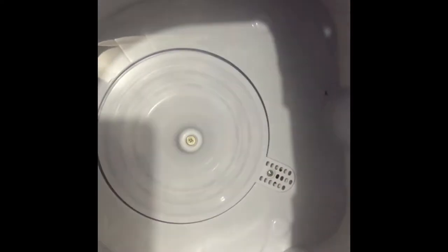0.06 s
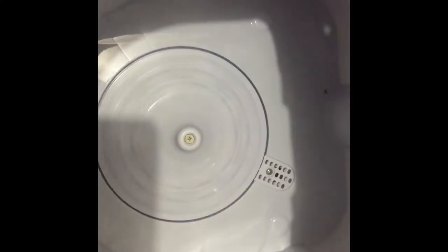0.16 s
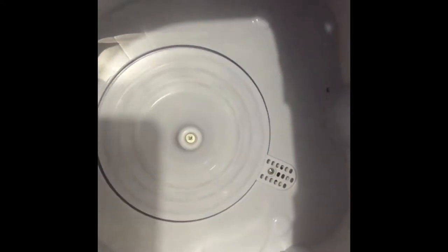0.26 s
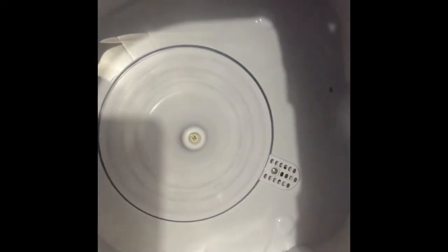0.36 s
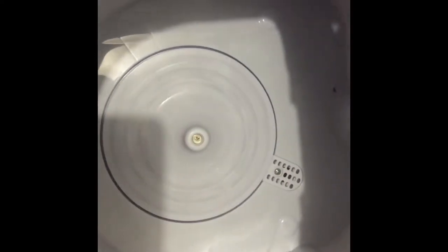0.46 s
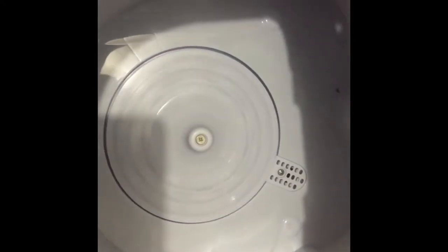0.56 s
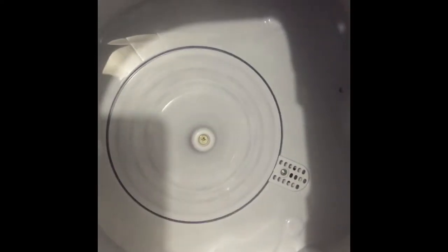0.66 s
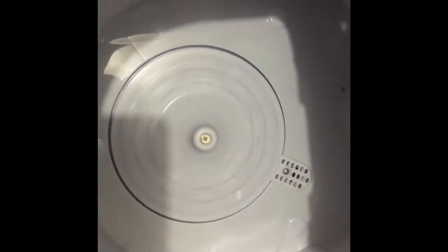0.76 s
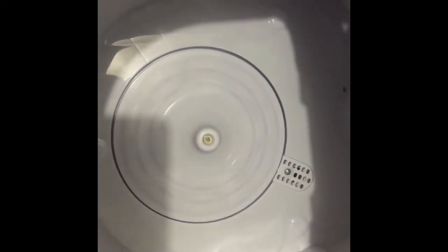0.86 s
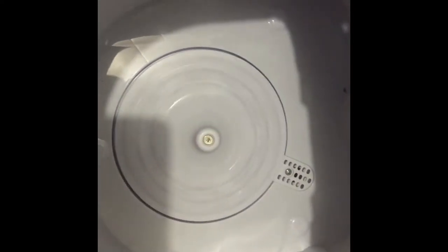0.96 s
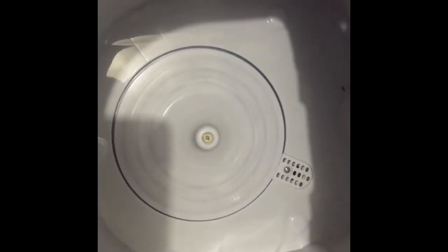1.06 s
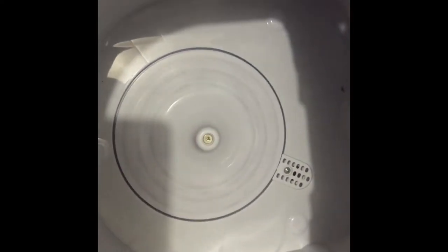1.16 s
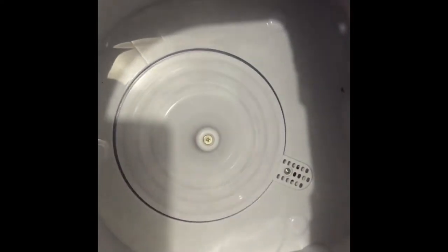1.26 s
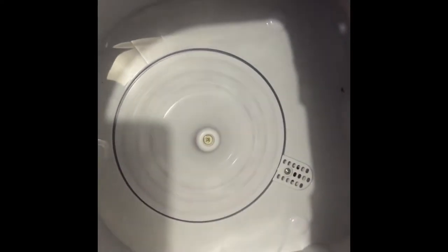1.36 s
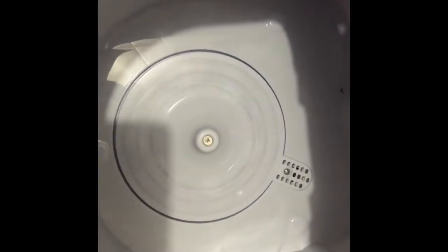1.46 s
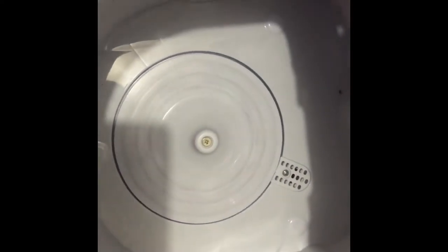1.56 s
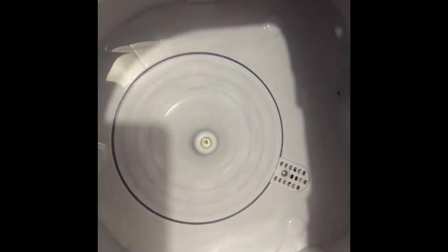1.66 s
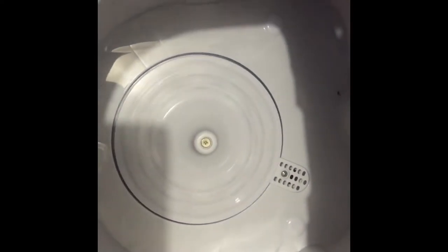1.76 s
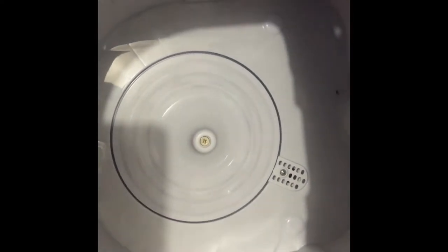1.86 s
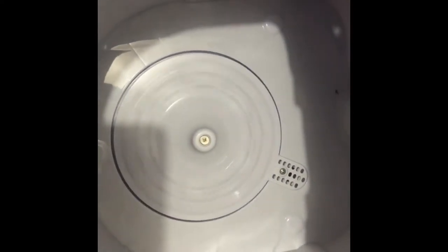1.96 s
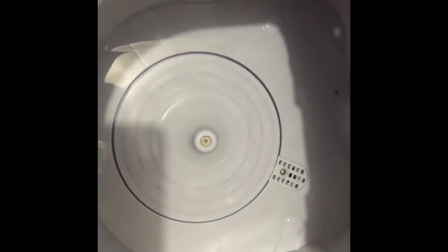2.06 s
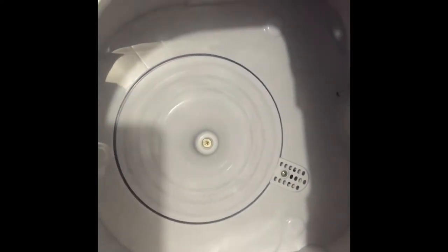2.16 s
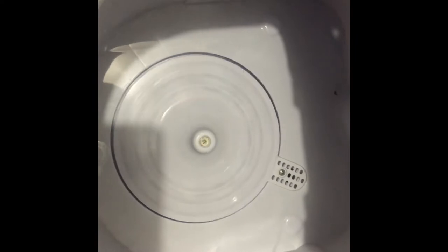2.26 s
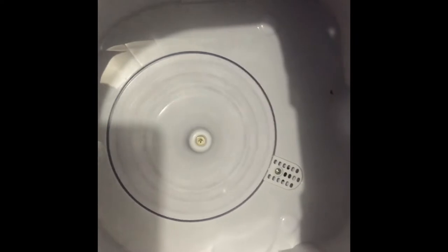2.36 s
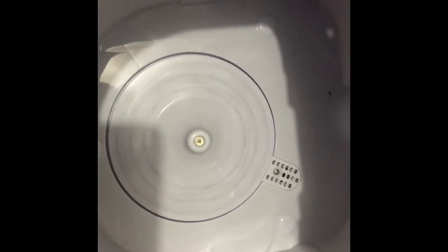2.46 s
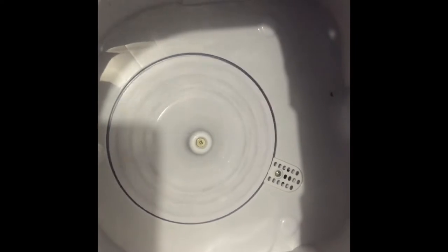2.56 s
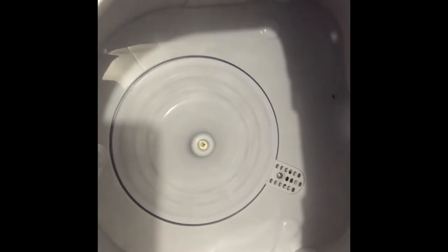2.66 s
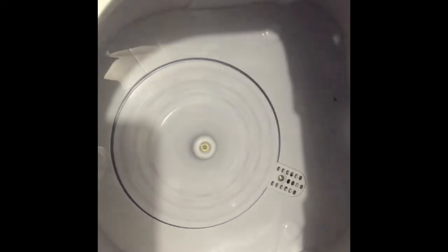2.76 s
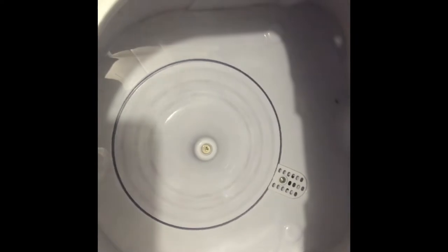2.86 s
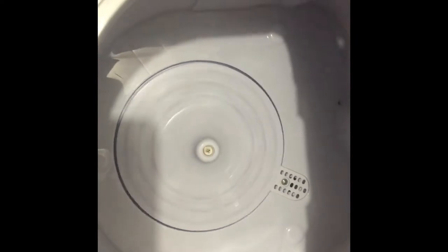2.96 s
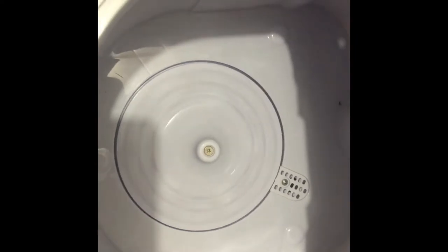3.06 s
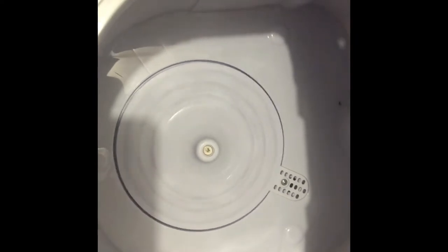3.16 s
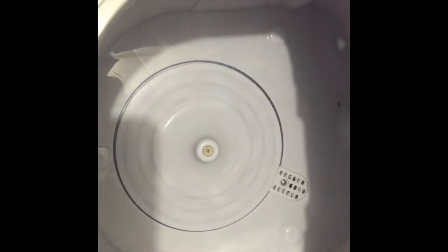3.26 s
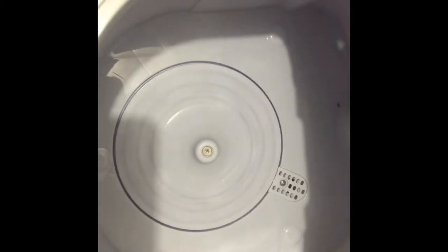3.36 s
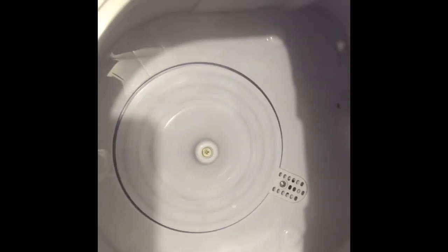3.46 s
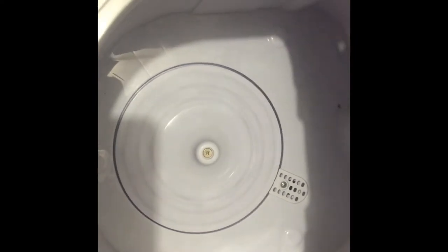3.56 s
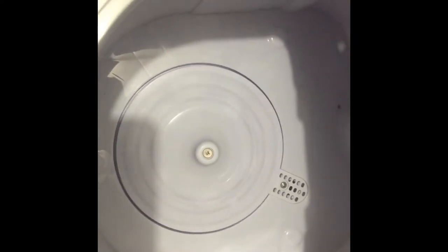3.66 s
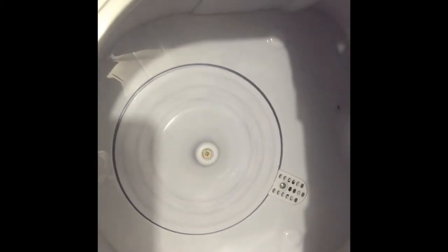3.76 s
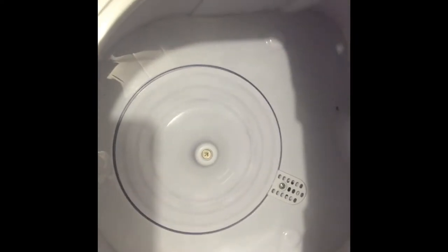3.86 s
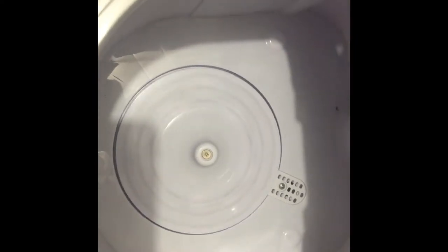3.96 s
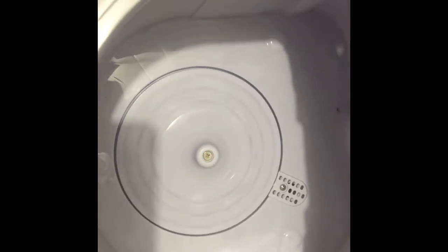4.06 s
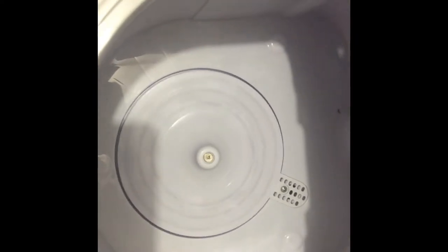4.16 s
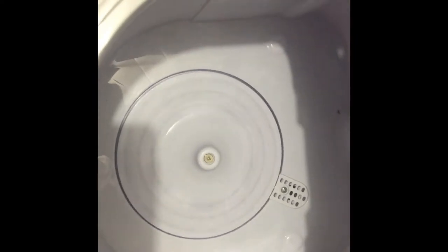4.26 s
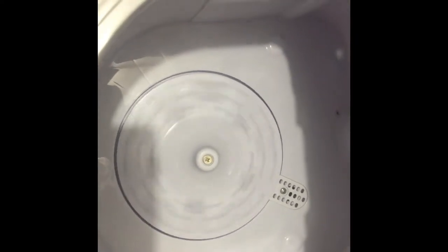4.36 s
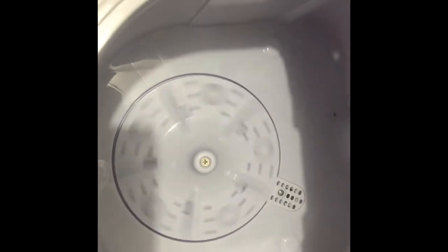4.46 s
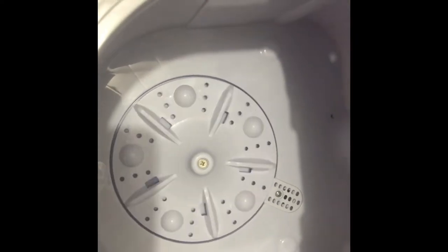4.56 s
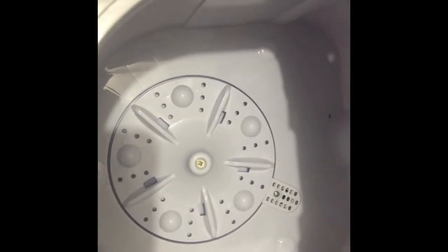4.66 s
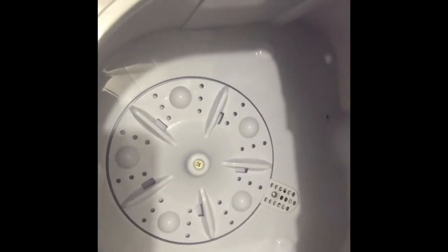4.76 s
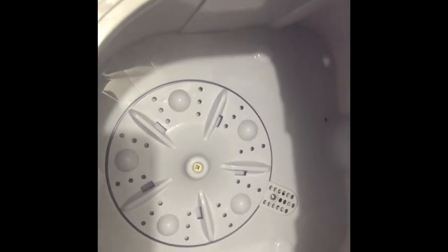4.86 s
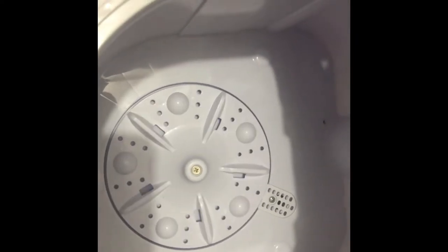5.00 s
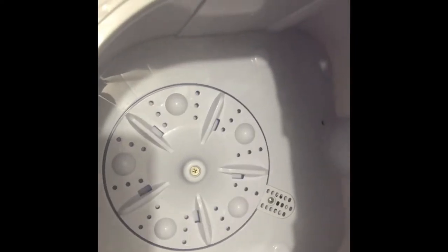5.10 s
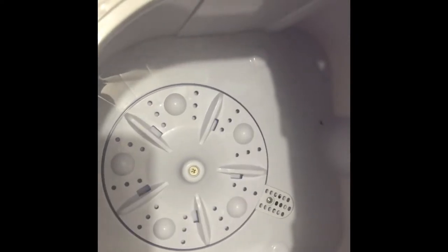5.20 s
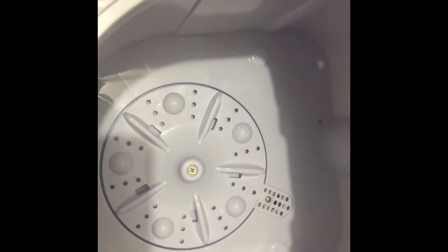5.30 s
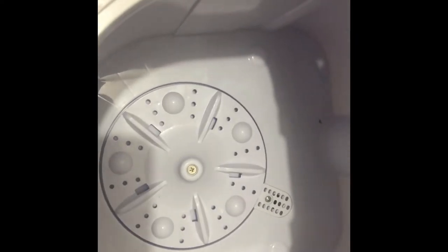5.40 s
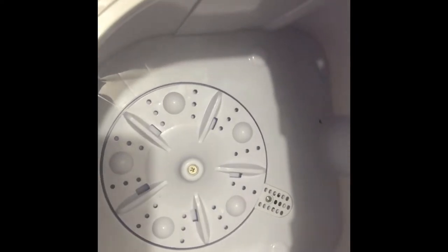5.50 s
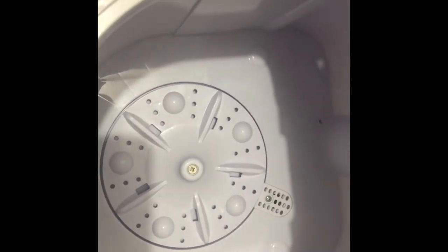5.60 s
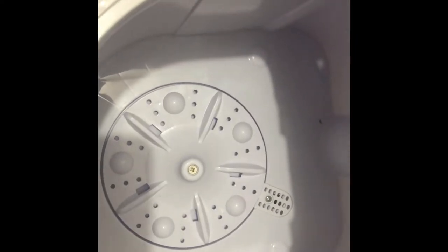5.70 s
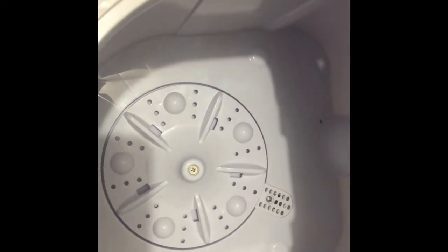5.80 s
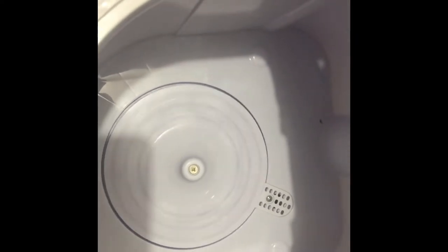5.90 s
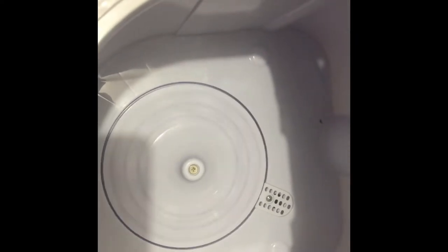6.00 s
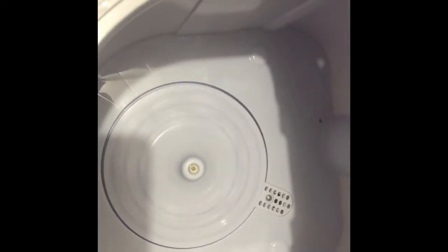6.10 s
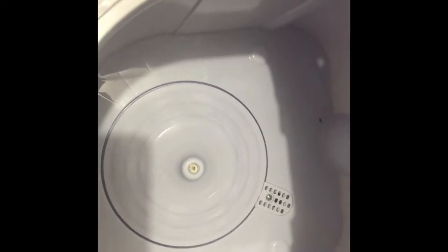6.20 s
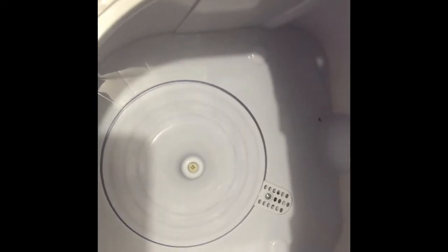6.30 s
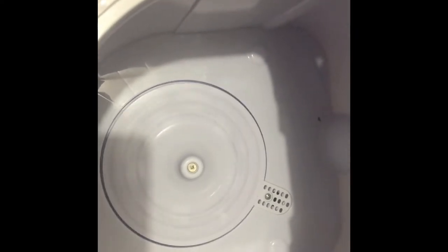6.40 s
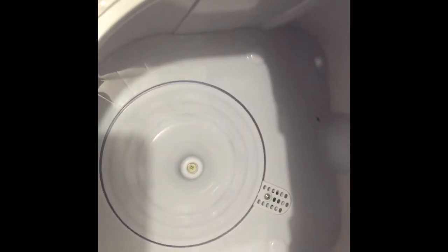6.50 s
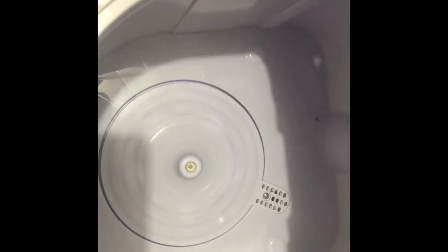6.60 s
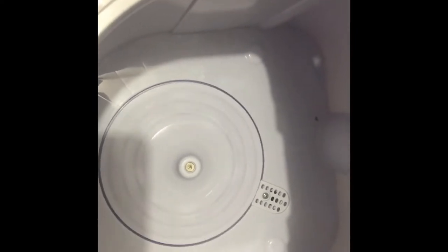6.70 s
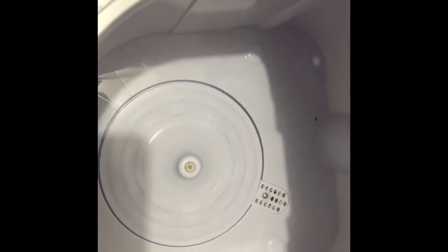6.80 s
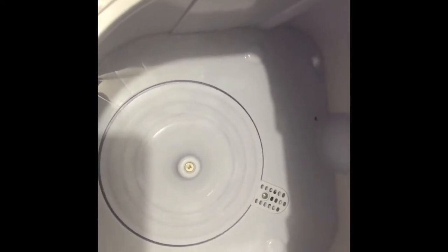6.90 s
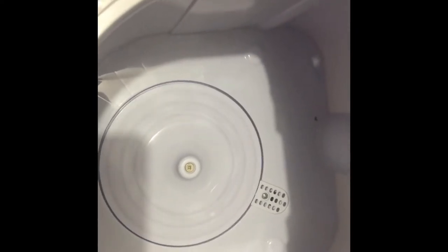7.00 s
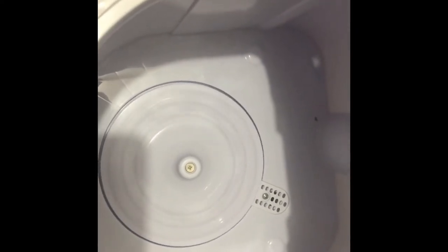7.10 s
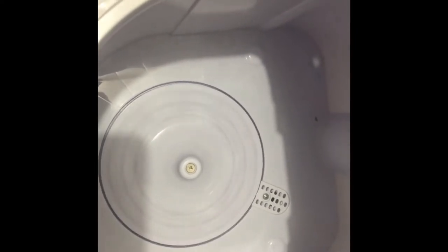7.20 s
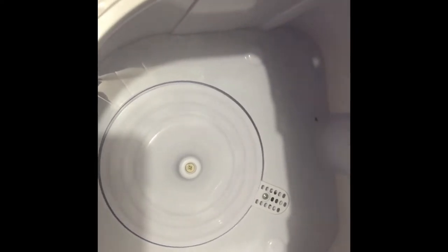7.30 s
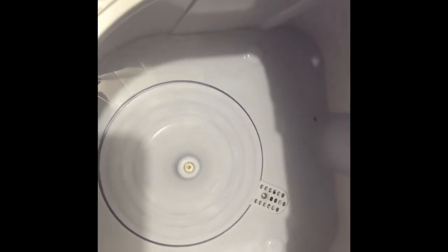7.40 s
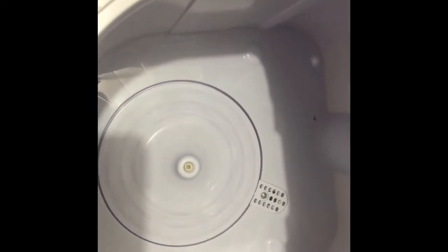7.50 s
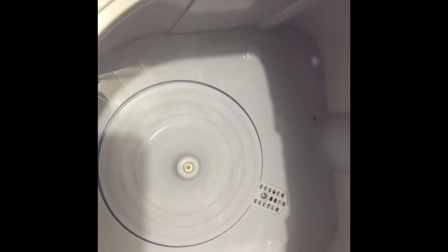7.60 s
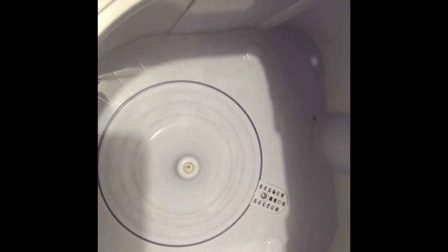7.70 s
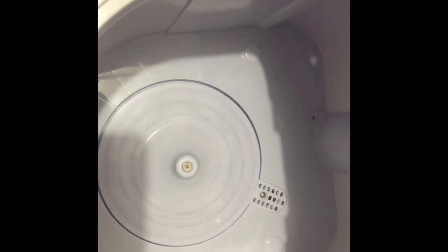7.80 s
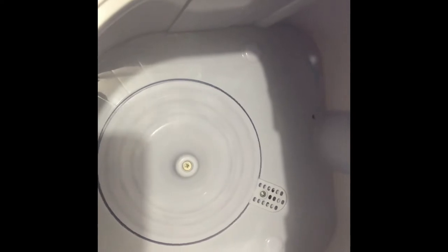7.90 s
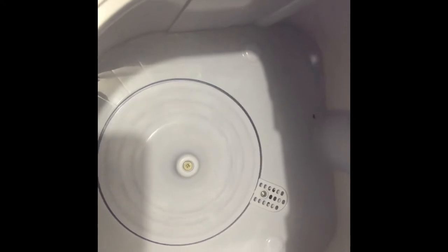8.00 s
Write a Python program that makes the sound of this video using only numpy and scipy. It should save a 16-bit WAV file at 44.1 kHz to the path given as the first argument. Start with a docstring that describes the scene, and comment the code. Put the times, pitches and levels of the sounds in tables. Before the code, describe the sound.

From 0 to 4.2 seconds a small electric motor turns the wash plate in an empty plastic tub, heard closely from above. Low mains hum and shaft tones make a steady, slightly swaying drone, with rumbling bumps, grainy bearing rattle around the middle range and a hissy belt swish about six times a second. At 4.2 the power cuts; the drone drops away and the drive coasts to rest by about 4.7, with small thumps at 4.23 and 4.35. A light, rapid flutter remains, dozens of short dry rubs a second with airy edges and thin sizzle, over low household noise and very faint tones. Its air swells slightly near 5.6. At 5.83 a sharp, bright switch snap and tub jolt restart the motor, which reaches full speed within a tenth of a second. The reversed drone, rattle and swish continue steadily until the end at about 8 seconds.

```python
"""The empty plastic tub of a small washing machine drones, heard from just above. A mains motor turns the wash plate
through a belt: shaft and hum tones drone, bumps shake the tub, bearings rattle and the belt joint swishes each lap.
Cut off, the drive coasts to rest and leaves a light flutter of rubs, each a short tone, some air and a thin sizzle.
A timer switch snaps in two noise bursts and the motor runs up the other way round. Low room noise lies beneath."""
import sys
import numpy as np
from scipy import signal
from scipy.fft import rfft, irfft, next_fast_len
from scipy.io import wavfile
from scipy.ndimage import uniform_filter1d

SR = 44100
rng = np.random.default_rng(int(sys.argv[2]) if len(sys.argv) > 2 else 0)


def store_pcm(level_fs):
    """Save levels as 16-bit WAV."""
    pcm = np.round(np.clip(level_fs, -1, 1) * 32767).astype(np.int16)
    wavfile.write(sys.argv[1], SR, np.atleast_2d(pcm).T)


N = 355005
TIME = np.arange(N) / SR

# full-speed turns a second of shaft, belt and wash plate; the magnetic pull comes at twice the mains frequency
SHAFT_HZ, BELT_HZ, PLATE_HZ, MAGNET_HZ = 28.45, 5.9084, 5.04, 120


def undb(db):
    """Decibels to gain."""
    return 10 ** (np.asarray(db) / 20)


def unit(x):
    """Scale to rms 1."""
    return x / np.sqrt(np.mean(x ** 2))


def colour(x, points):
    """Pass a sound through a response drawn between (Hz, dB) points on a log frequency axis; rms 1."""
    size = next_fast_len(N)
    hz, db = np.transpose(points)
    bins = np.maximum(np.fft.rfftfreq(size, 1 / SR), 1)
    gain = undb(np.interp(np.log(bins), np.log(hz), db))
    return unit(irfft(rfft(x, size) * gain, size)[:N])


def noise(points):
    """Coloured noise of rms 1."""
    return colour(rng.standard_normal(N), points)


def walk(rate):
    """Smooth random wander of rms 1, drawing a new value about rate times a second."""
    hold = max(int(SR / rate), 2)
    steps = np.repeat(rng.standard_normal(N // hold + 1), hold)
    return unit(uniform_filter1d(uniform_filter1d(steps, hold), hold)[:N])


def cycle(turns):
    """Cosine of an angle given in turns."""
    return np.cos(2 * np.pi * turns)


def bump(turns, width):
    """A smooth pulse at every whole turn; width in turns."""
    offset = (turns + .5) % 1 - .5
    return np.exp(-.5 * (offset / width) ** 2)


def bell(centre_s, width_s):
    """A single smooth rise and fall in time, peaking at 1."""
    return np.exp(-.5 * ((TIME - centre_s) / width_s) ** 2)


def decay(age, t60):
    """Exponential fall by 60 dB in t60 seconds."""
    return np.exp(-np.log(1000) * age / t60)


def surface(turns, count):
    """Unevenness of a turning part: the same bumps come round on every turn."""
    return unit(np.interp(turns % 1, np.linspace(0, 1, count), rng.standard_normal(count)))


# the motor is cut, coasts to rest, is switched on in reverse and runs up (seconds)
CUT_S, COAST_S, RESTART_S, RUN_UP_S = 4.21, .47, 5.83, .096


def motor(release_s=0.013, attack_s=0.065):
    """Speed (share of full, negative = reversed) and electric pull (0-1) through cut, coast and restart."""
    coast = np.clip(1 - (TIME - CUT_S) / COAST_S, 0, 1) ** 2
    run_up = np.clip((TIME - RESTART_S) / RUN_UP_S, 0, 1)
    release = np.exp(-np.maximum(TIME - CUT_S, 0) / release_s)
    attack = np.clip((TIME - RESTART_S) / attack_s, 0, 1) ** 2
    return coast - run_up, release + attack


def effort(speed, power, coast_db):
    """Force on the drive: it grows with speed and drops by coast_db when the motor freewheels."""
    return np.abs(speed) * (power + (1 - power) * undb(coast_db))


# The belt slackens, its joint crawls over a pulley, the motor kicks in.
# Each row: start in seconds, nominal strength in dB.
TUB_JOLTS = [(4.228, -1), (4.352, -4.5), (5.832, 1.5)]


def jolts(rise_s=0.0023, decay_s=0.032):
    """Each jolt shakes the tub briefly: a fast rise and a short decay."""
    out = np.zeros(N)
    for start, db in TUB_JOLTS:
        age = np.maximum(TIME - start, 0)
        out += undb(db) * (1 - np.exp(-age / rise_s)) * np.exp(-age / decay_s)
    return out


# Multiples of the shaft rate that the tub radiates: one plain multiple per entry.
SHAFT_MULTIPLES = (2, 5, 7, 8, 9, 10)
# Nominal strength of those multiples. Each row: forward level in dB, reversed level in dB.
SHAFT_LEVELS = [(-44, -42.5), (-34.5, -31.5), (-25.5, -26), (-33, -30.5), (-50, -37.5), (-35.5, -43)]
# Magnetic hum from its first harmonic up. Each row: forward level in dB, reversed level in dB.
HUM_LEVELS = [(-31.5, -29), (-37, -42), (-39, -41.5), (-54, -53), (-53.5, -56)]
# Sidebands one, two and three shaft rates above each hum harmonic, before the fall above the corner.
# Each row: forward level in dB, reversed level in dB.
SIDEBAND_LEVELS = [(-34.5, -39), (-37, -37.5), (-39.5, -42.5)]
# The one sideband below a hum harmonic. One row: hum harmonic, multiple of the shaft rate.
LOW_SIDEBAND = (4, -1)
# Its nominal strength. One row: forward level in dB, reversed level in dB.
LOW_SIDEBAND_LEVELS = (-45.5, -55)


def drone_lines(corner_hz=283.6, fall_db_per_octave=19):
    """Rows (hum harmonic, shaft multiple, (forward dB, reversed dB)); the turning rotor adds sidebands to the hum."""
    lines = [(0, shaft, db) for shaft, db in zip(SHAFT_MULTIPLES, SHAFT_LEVELS)]
    for pull, hum_db in enumerate(HUM_LEVELS, 1):
        lines.append((pull, 0, hum_db))
        for shaft, db in enumerate(SIDEBAND_LEVELS, 1):
            hz = pull * MAGNET_HZ + shaft * SHAFT_HZ
            octaves = max(np.log2(hz / corner_hz), 0)
            lines.append((pull, shaft, np.array(db) - fall_db_per_octave * octaves))
    return lines + [(*LOW_SIDEBAND, LOW_SIDEBAND_LEVELS)]


def drone(speed, shake, power, belt_sway=0.18, plate_sway=0.27, waver_db=0.22, slip_turns=0.017):
    """Shaft harmonics and magnetic hum with shaft sidebands; belt and plate make the shaft-borne lines sway."""
    out = 0
    travel = np.cumsum(np.abs(speed)) / SR
    slip = slip_turns * walk(4.3)
    for pull, shaft, (forward_db, reverse_db) in drone_lines():
        start, belt_angle, plate_angle = rng.random(3)
        turns = pull * MAGNET_HZ * TIME + shaft * SHAFT_HZ * travel + start
        drive = power if pull else shake
        gain = np.where(speed > 0, undb(forward_db), undb(reverse_db)) * drive
        if shaft:  # the pure mains hum gets no slip or sway
            turns = turns + slip
            sway = belt_sway * cycle(BELT_HZ * travel + belt_angle)
            sway = sway + plate_sway * cycle(PLATE_HZ * travel + plate_angle)
            gain = gain * (1 + sway) * undb(waver_db * walk(10))
        out = out + np.sqrt(2) * gain * cycle(turns)
    return out


# Tub shaken by belt and plate. Each row: frequency in Hz, relative level in dB.
TUB_RESPONSE = [(12, -70), (25, -46), (36, -30), (44, -12), (66, -12.5), (80, -17), (112, -15.5),
                (135, -8.5), (165, 1), (210, 3), (255, -7), (320, -5), (480, -20.5), (800, -50)]


def rumble(travel, speed, level_db=-26.5, plate_db=-1, loose_db=-2):
    """Bumps of belt and wash plate, plus loose play, shake the tub."""
    belt_bumps = colour(speed * surface(BELT_HZ * travel, count=500), TUB_RESPONSE)
    plate_bumps = colour(speed * surface(PLATE_HZ * travel, count=600), TUB_RESPONSE)
    loose_play = noise(TUB_RESPONSE)
    return undb(level_db) * unit(belt_bumps + undb(plate_db) * plate_bumps + undb(loose_db) * loose_play)


# Bearing rattle. Each row: frequency in Hz, relative level in dB.
RATTLE_COLOUR = [(300, -28), (520, -7.5), (650, 1), (780, -0.5), (950, 2), (1300, -3.5), (1620, -6.5),
                 (1710, -17.5), (1800, -8.5), (2100, -13), (2900, -18.5), (4200, -26.5), (8000, -34.5),
                 (15000, -62)]


def rattle(travel, level_db=-35.5, shaft_depth=0.15, magnet_depth=0.23, grain_db=2.0, grain_rate=450,
           surge_db=0.27, repeat_db=-6):
    """Dense uneven knocks in the bearings, harder once a shaft turn and at every magnetic pull."""
    shaft_pressure = 1 + shaft_depth * cycle(SHAFT_HZ * travel)
    magnet_pressure = 1 + magnet_depth * cycle(MAGNET_HZ * TIME)
    # part of the roughness comes round again with each belt lap
    roughness = rng.standard_normal(N) + undb(repeat_db) * surface(BELT_HZ * travel, count=5000)
    knocks = roughness * undb(grain_db * walk(grain_rate) + surge_db * walk(60))
    return undb(level_db) * colour(knocks * shaft_pressure * magnet_pressure, RATTLE_COLOUR)


# Running hiss of the belt. Each row: frequency in Hz, relative level in dB.
BELT_HISS = [(1500, 15), (3000, 1), (4200, -5), (5800, 10.5), (7000, -5.5), (8200, 0), (10000, -1),
             (13500, -8), (15800, -13)]
# Swish of the belt joint. Each row: frequency in Hz, relative level in dB.
JOINT_SWISH = [(1500, 6), (4000, 0.5), (6500, -0.5), (8000, 2.5), (10000, 0.5), (13500, -3.5),
               (15800, -6.5)]


def belt(travel, speed, first_joint_s=.0925, hiss_db=-54, joint_db=-44, width=0.042, scatter_db=1.0,
         reversed_db=-0.4):
    """The belt hisses over the pulleys and its joint swishes once a lap, a little softer in reverse."""
    hiss = np.abs(speed) * undb(hiss_db) * noise(BELT_HISS)
    joint = bump(BELT_HZ * (travel - first_joint_s), width) * undb(joint_db + scatter_db * walk(6))
    swish = np.sqrt(np.abs(speed)) * joint * noise(JOINT_SWISH)
    return undb(reversed_db * (speed < 0)) * (hiss + swish)


# rubs a second before surge and wander, and time of the first (seconds)
FLUTTER_HZ, FIRST_RUB_S = 38.0, .0085
# the fluttering part runs briefly ahead as the drive stops: centre and width (seconds), lead (rubs)
SURGE_S, SURGE_WIDTH_S, SURGE_RUBS = 4.43, .2, .8
# the flutter's air swells late in the pause: centre and width (seconds), lift (dB)
SWELL_S, SWELL_WIDTH_S, SWELL_DB = 5.6, .2, 3.5
# Soft air around each rub. Each row: frequency in Hz, relative level in dB.
RUB_AIR = [(1000, -14), (3300, 10), (5000, -4.5), (8000, -2.5), (11000, -14), (16000, -30)]
# Thin sizzle at each rub. Each row: frequency in Hz, relative level in dB.
RUB_SIZZLE = [(6000, -4.5), (10800, -24), (11900, -3), (12700, -6), (13700, -10), (14350, 1), (14700, -21),
              (16000, -30)]


def flutter(level_db=-41.5, chirp_hz=860, scatter_hz=22, width=0.12, air_db=-19, air_width=0.29,
            sizzle_db=-17.0, lead=.22, fade=0.49, uneven=0.3, scatter_db=1.0, wander=.03):
    """A light part that keeps turning rubs twice a turn: air, a sizzle and a short tone, long and short by turns."""
    surge = SURGE_RUBS * bell(SURGE_S, SURGE_WIDTH_S)
    rubs = FLUTTER_HZ * (TIME - FIRST_RUB_S) + surge + wander * walk(5)
    # each rub draws its own pitch, phase and force
    index = np.maximum(np.round(rubs), 0).astype(int)
    count = int(FLUTTER_HZ * (TIME[-1] + 1))
    pitch, angle, force = rng.standard_normal((count, 3))[index].T
    side = uneven * cycle(rubs / 2)
    tone = np.sqrt(2) * cycle(np.cumsum(chirp_hz + scatter_hz * pitch) / SR + angle)
    chirp = tone * bump(rubs, width * (1 + side))
    swell_db = SWELL_DB * bell(SWELL_S, SWELL_WIDTH_S)
    air = undb(air_db + swell_db) * bump(rubs, air_width) * noise(RUB_AIR)
    # the sizzle starts abruptly on contact, just before the chirp has built up, and holds until the parts separate
    contact = np.exp(-(((rubs + lead) % 1) / fade) ** 4)
    sizzle = undb(sizzle_db) * (1 - side) * contact * noise(RUB_SIZZLE)
    return undb(level_db + scatter_db * force) * (chirp + air + sizzle)


# Colour of the switch snap. Each row: frequency in Hz, relative level in dB.
SNAP_COLOUR = [(590, -38), (1000, -6), (2360, -16), (2710, -2.5), (3300, -10), (5850, -6), (7880, -3),
               (8440, -7), (13500, -8), (15500, -19)]
# Trip and snap of the switch contact. Each row: start in seconds, nominal level in dB.
SWITCH_CONTACTS = [(5.829, -32), (5.832, -22.5)]


def switch(snap_t60=0.027, tail_db=-20, tail_t60=0.19, rise_s=0.00076):
    """The timer contact trips and snaps shut; the tub holds a short tail."""
    out = np.zeros(N)
    for start, db in SWITCH_CONTACTS:
        age = np.maximum(TIME - start, 0)
        rise = 1 - np.exp(-age / rise_s)
        fall = decay(age, snap_t60) + undb(tail_db) * decay(age, tail_t60)
        out += undb(db) * rise * fall * noise(SNAP_COLOUR)
    return out


# Resonances of the plastic shell. Each row: frequency in Hz, width in Hz, nominal lift in dB (negative = dip).
SHELL_MODES = [(1730, 47, 10), (2793, 26, 5), (3300, 80, 4), (3940, 69, 4), (4160, 190, 4), (4610, 85, 4),
               (6970, 63, 3), (7920, 110, 4), (8840, 120, 3), (11000, 80, 4.5), (12463, 60, 2),
               (13050, 54, -7)]


def shell(x, dull_db=-0.26, echo_db=-10, echo_t60=0.046):
    """The shell's resonances colour any broad sound; the tub walls add a cluster of early echoes."""
    out = undb(dull_db) * x
    for hz, width, db in SHELL_MODES:
        b, a = signal.iirpeak(hz, hz / width, fs=SR)
        out = out + (undb(db) - 1) * signal.lfilter(b, a, x)
    age = TIME[:SR // 20]
    # random echoes begin 2 ms after the direct sound
    echoes = rng.standard_normal(len(age)) * decay(age, echo_t60) * (age > .002)
    echoes = signal.lfilter(*signal.butter(4, 2200, "high", fs=SR), echoes)
    echoed = signal.fftconvolve(out, echoes / np.linalg.norm(echoes))[:N]
    return (out + undb(echo_db) * echoed) / np.hypot(1, undb(echo_db))


def wavering(hz, waver_db=2.0, drift_turns=0.079):
    """A tone of rms 1 that is unsteady in level and pitch."""
    return unit(undb(waver_db * walk(8)) * cycle(hz * TIME + drift_turns * walk(14)))


# Low household background. Each row: frequency in Hz, relative level in dB.
ROOM_COLOUR = [(25, -16), (45, -2), (62, -4), (74, 4.5), (95, -6.5), (140, 1), (230, -2), (400, -8.5),
               (700, -12), (1300, -14), (2200, -17), (3400, -23.5), (7000, -29), (15000, -40)]
# Faint brief tones in the pause. Each row: centre in seconds, length in seconds, frequency in Hz, level in dB.
PASSING_TONES = [(4.84, .27, 74.4, -47), (5.448, 0.7, 74.6, -52), (5.48, 0.36, 141, -52),
                 (5.695, 0.22, 427, -50)]


def room(level_db=-46, swell_db=1):
    """Low household noise that slowly swells, with a few faint passing tones."""
    out = undb(level_db + swell_db * walk(4.235)) * noise(ROOM_COLOUR)
    for centre, length, hz, db in PASSING_TONES:
        window = np.cos(np.pi * np.clip((TIME - centre) / length, -.5, .5))
        out = out + undb(db) * window * wavering(hz)
    return out


def scene(coast_shake_db=-5, coast_rattle_db=-8.5, drone_power=3.1, reversed_rattle_db=-.7,
          reversed_rumble_db=-0.94):
    """One motor motion drives drone, rumble, rattle and belt; rumble, rattle and belt are softer in reverse."""
    speed, power = motor()
    travel = np.cumsum(speed) / SR  # seconds' worth of full-speed turning
    backwards = speed < 0
    shake = effort(speed, power, coast_shake_db) + jolts()
    load = effort(speed, power, coast_rattle_db) * undb(reversed_rattle_db * backwards)
    # unbalance grows with speed, so the tones die before the loose rumble does
    tones = np.abs(speed) ** drone_power * drone(speed, shake, power)
    low = tones + shake * undb(reversed_rumble_db * backwards) * rumble(travel, speed)
    bright = load * rattle(travel) + belt(travel, speed) + flutter() + switch()
    return (low + shell(bright) + room())[None]


def record(dry, top_hz=15500):
    """The phone cuts the top: a steep low-pass."""
    return signal.sosfilt(signal.ellip(10, .2, 80, top_hz, fs=SR, output="sos"), dry)


dry = scene()
out = record(dry)
store_pcm(out)
```